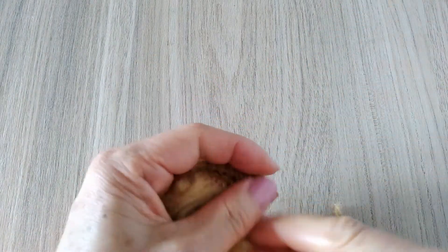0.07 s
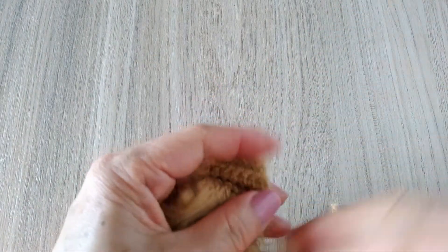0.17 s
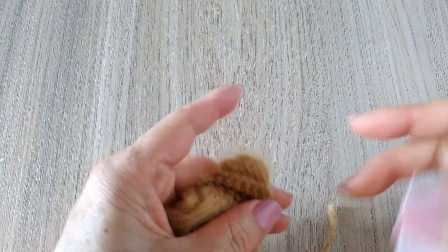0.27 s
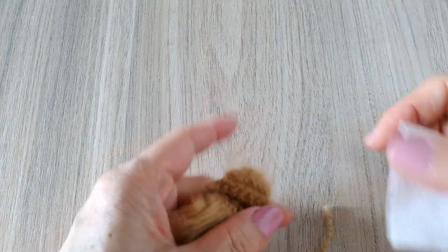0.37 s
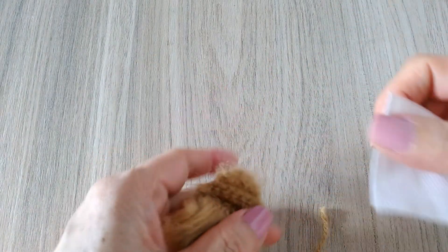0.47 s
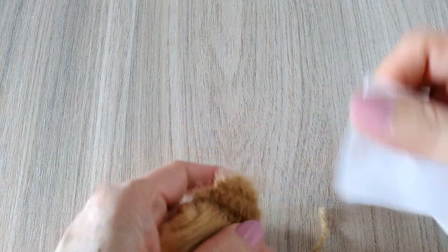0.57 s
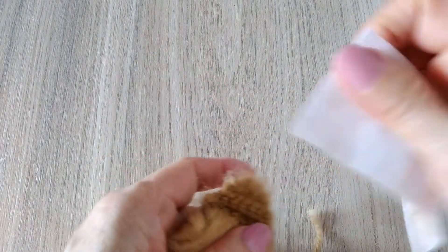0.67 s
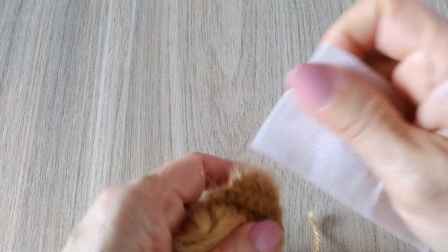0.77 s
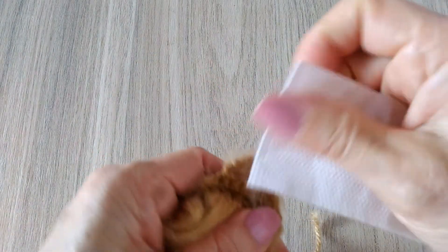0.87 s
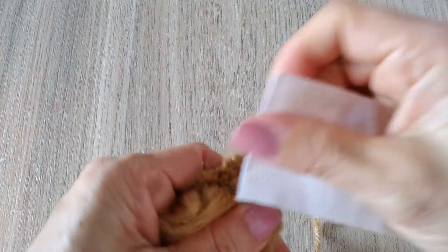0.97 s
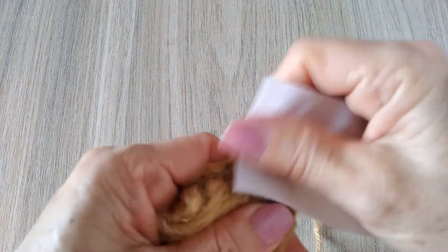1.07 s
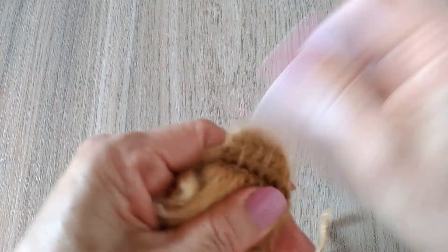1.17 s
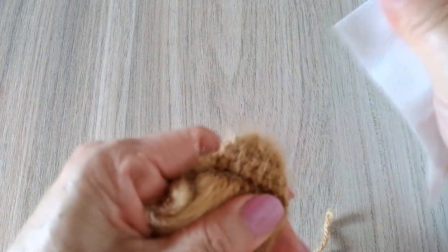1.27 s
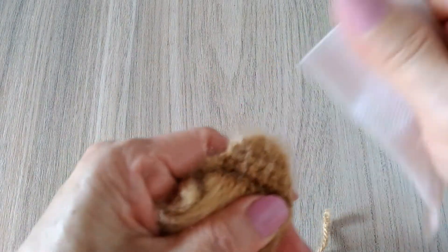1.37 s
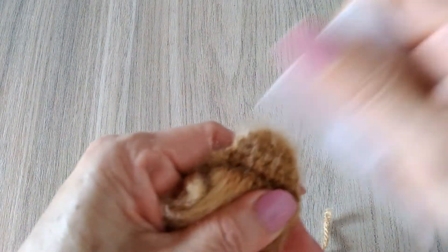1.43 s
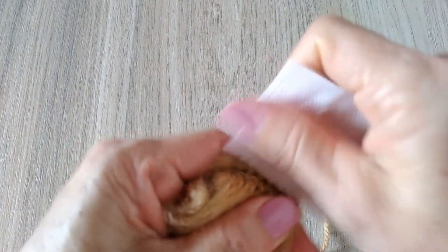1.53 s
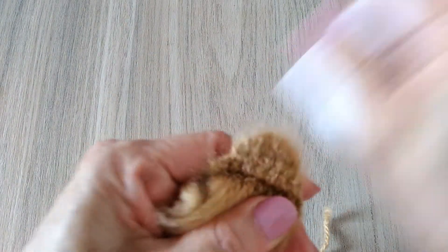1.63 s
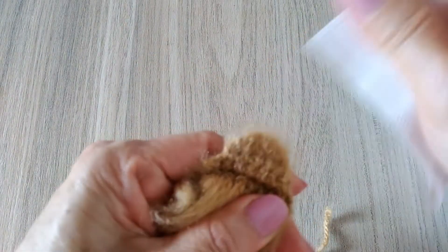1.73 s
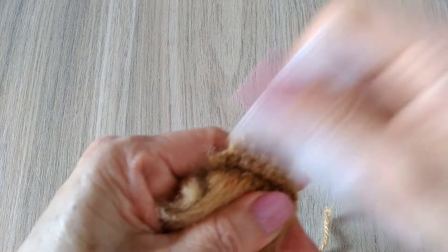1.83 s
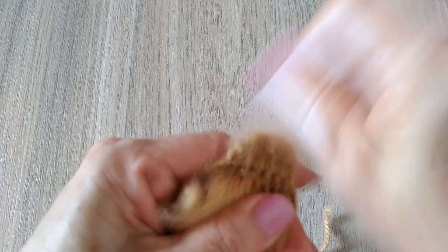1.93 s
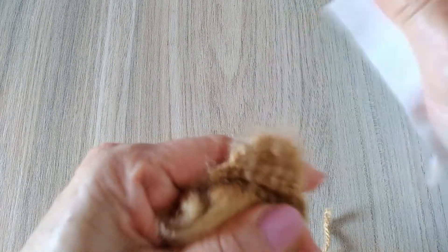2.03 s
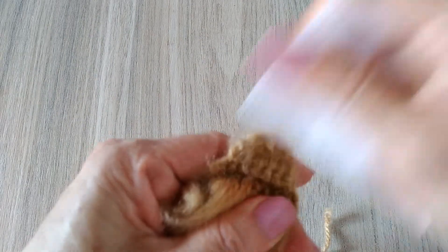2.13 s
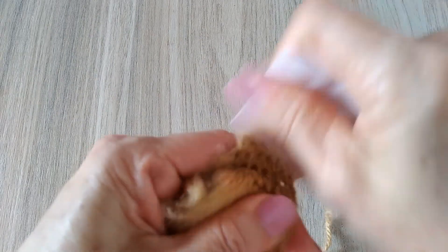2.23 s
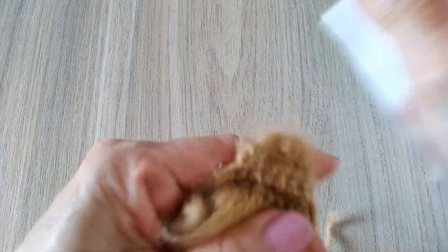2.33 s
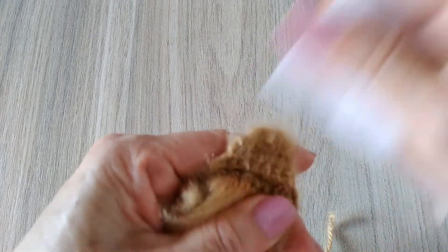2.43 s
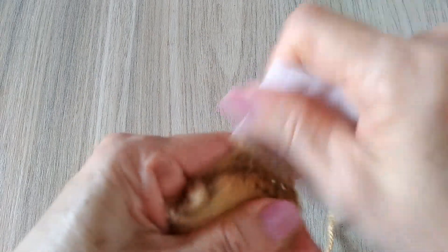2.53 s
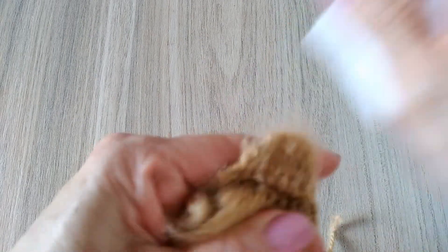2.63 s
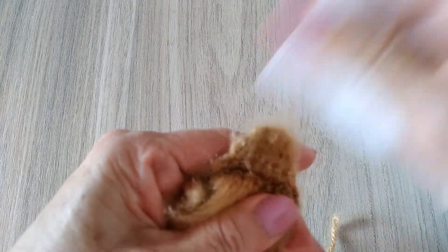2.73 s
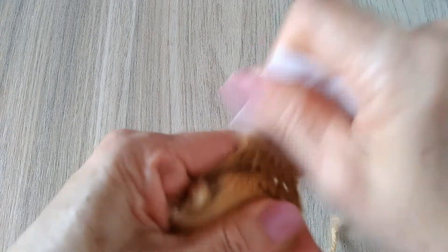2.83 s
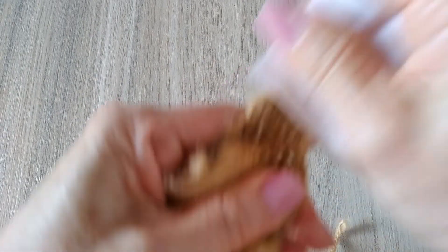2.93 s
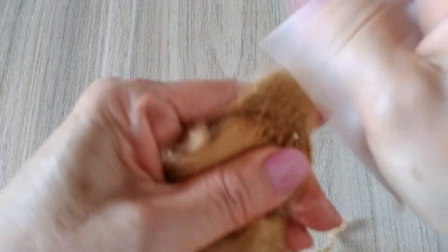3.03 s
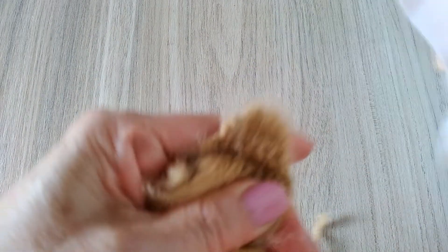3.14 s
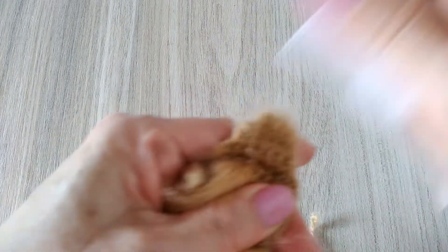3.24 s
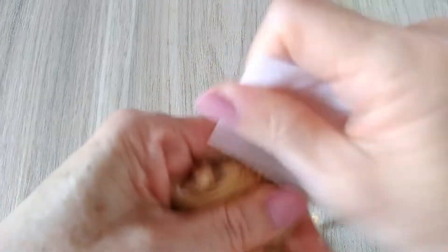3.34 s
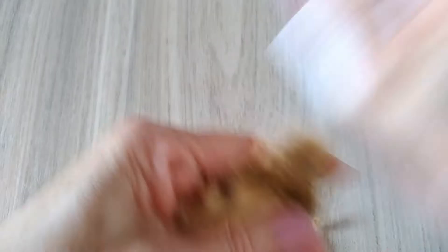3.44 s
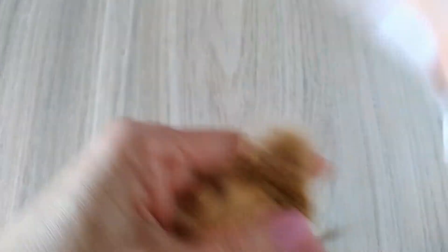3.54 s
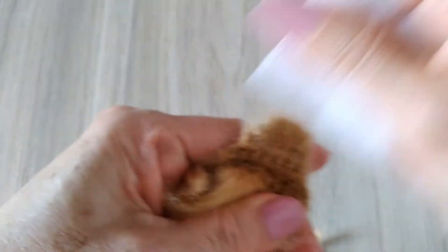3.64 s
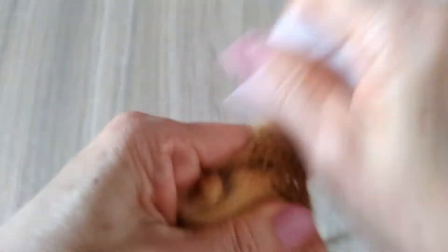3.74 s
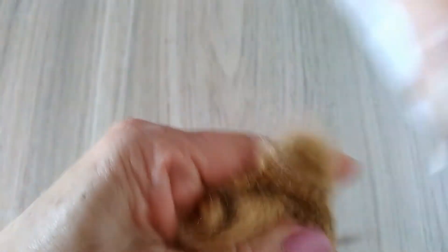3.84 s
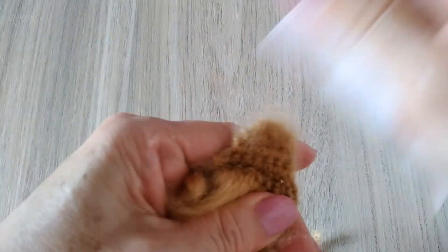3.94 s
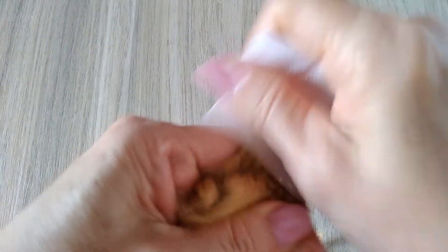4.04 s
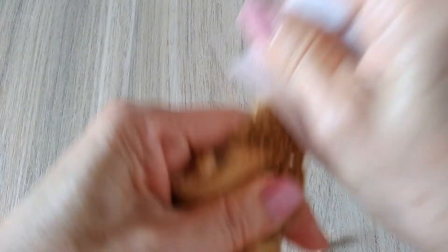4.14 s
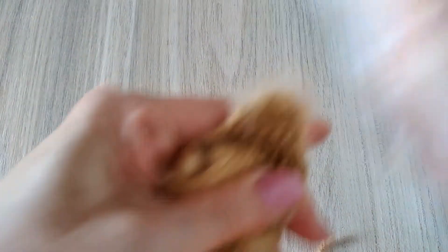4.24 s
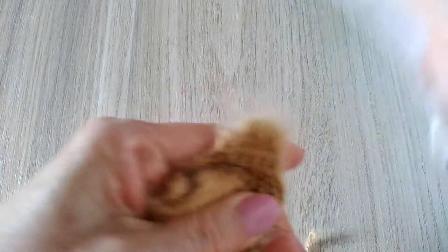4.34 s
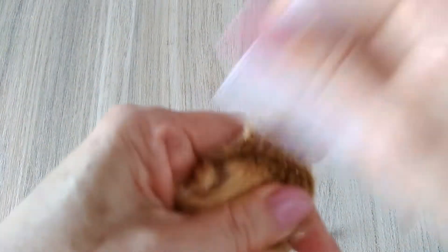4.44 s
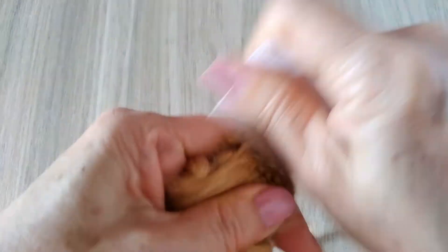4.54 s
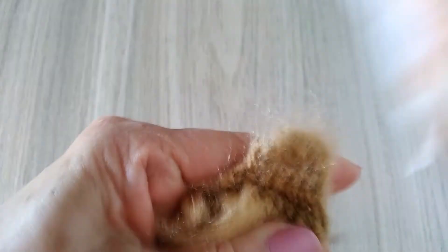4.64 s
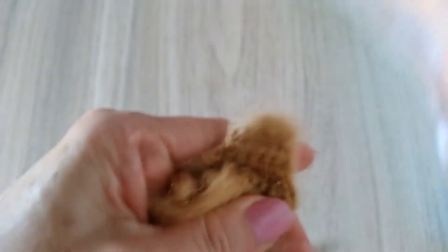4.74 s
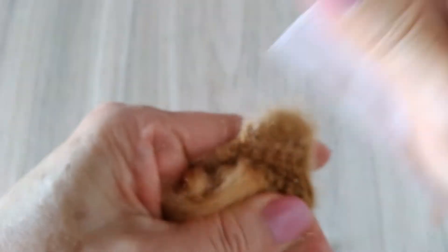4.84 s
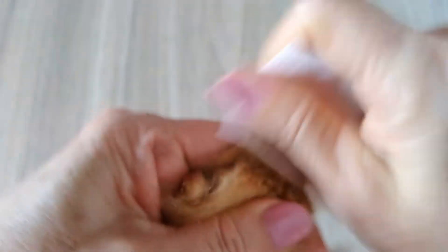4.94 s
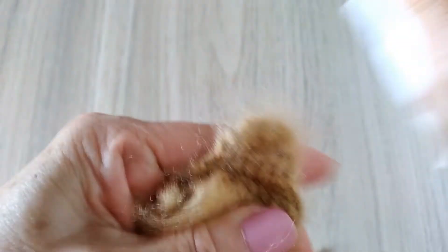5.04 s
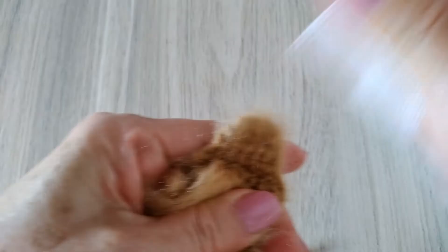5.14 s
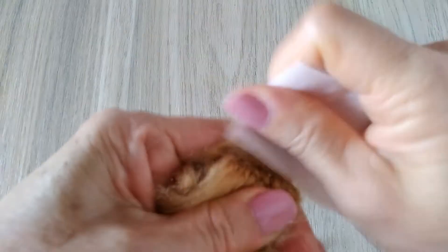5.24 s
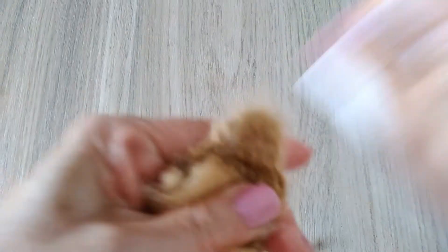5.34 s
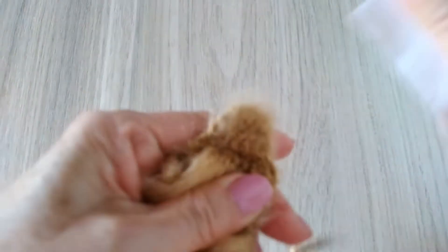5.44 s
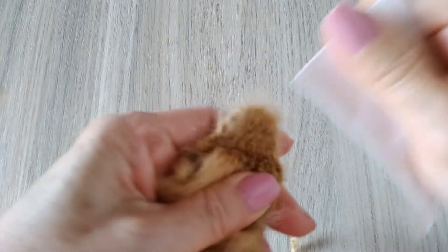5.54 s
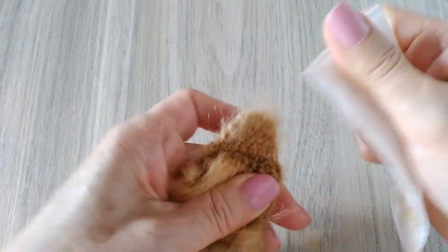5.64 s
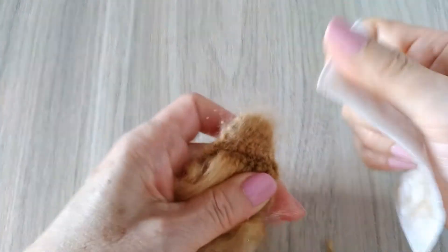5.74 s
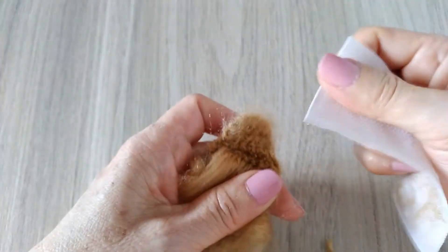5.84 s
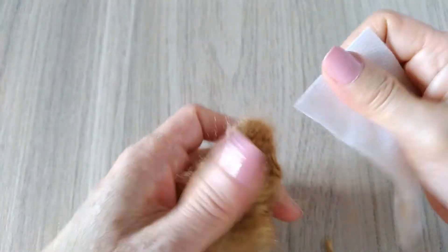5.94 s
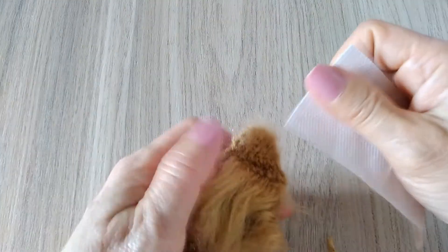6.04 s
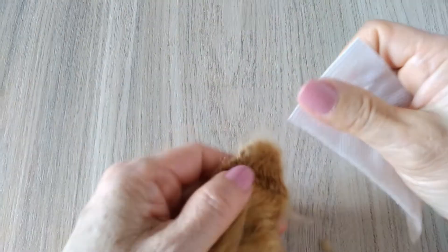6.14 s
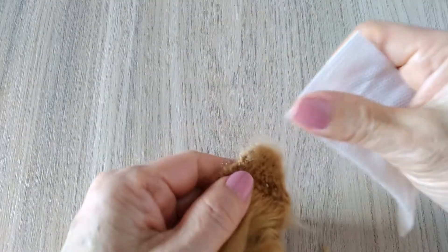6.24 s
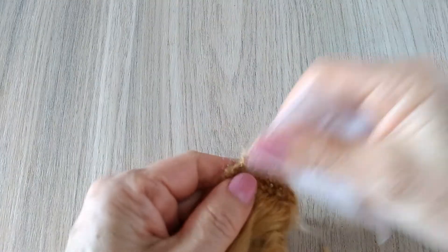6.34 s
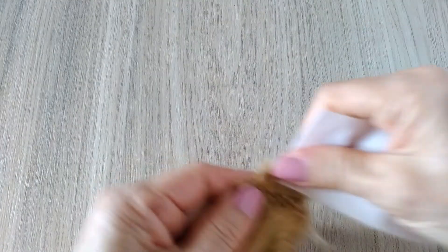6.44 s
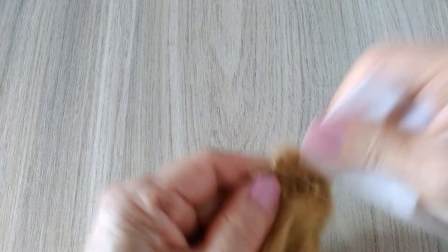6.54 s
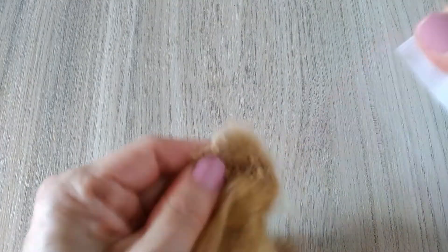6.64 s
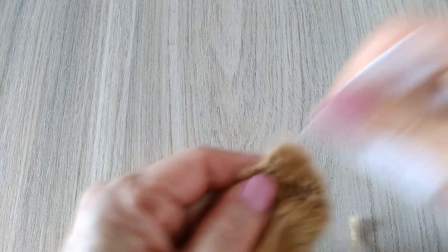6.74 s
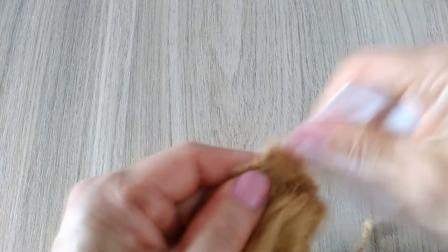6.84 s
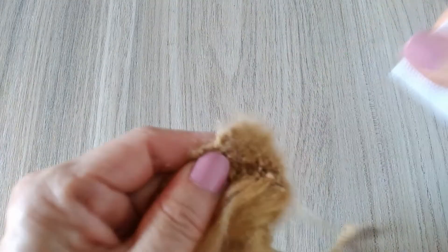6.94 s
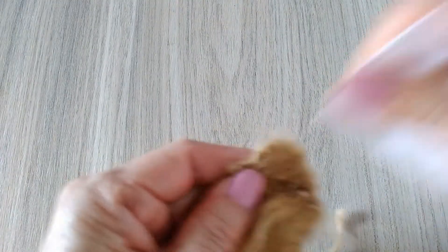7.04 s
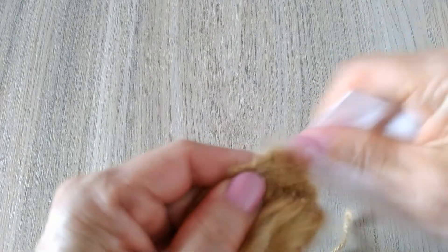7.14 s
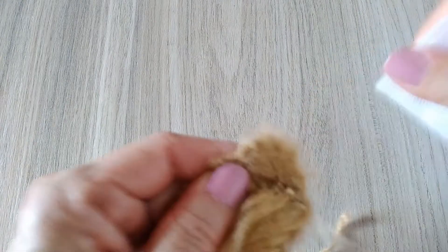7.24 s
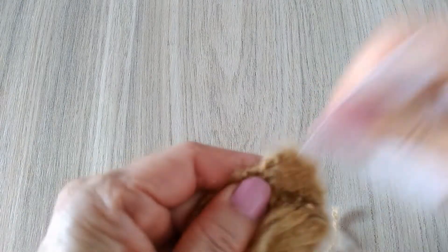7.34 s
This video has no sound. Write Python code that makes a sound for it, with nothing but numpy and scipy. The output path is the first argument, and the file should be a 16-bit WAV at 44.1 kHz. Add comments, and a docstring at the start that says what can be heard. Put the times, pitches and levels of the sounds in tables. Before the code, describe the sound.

Very close to the microphone at a table in a small furnished room, fingers lightly tick and rustle, then a hook-surfaced strip scratches wool yarn in short separate strokes. Each crackling rasp swells quickly and ends in an abrupt snap with a dull little jolt. About three strokes come every second, then a pause with handling sounds and a few softer strokes. Faint rumble and a distant engine hum lie far underneath.

```python
"""A hook strip is brushed over a tuft of wool yarn, close to a phone above a table in a small room.
Each stroke is a swarm of random snaps through strip resonances; it swells, then the strip slips off.
Single hooks snap and the hands jolt (noise bursts); fingers tick and rustle (filtered noise, snaps).
Behind: noise rumble, a dying sine drone and a far engine of sine orders. The phone mutes quiet treble."""
import sys
import numpy as np
from scipy import signal
from scipy.fft import rfft, irfft
from scipy.io import wavfile
from scipy.ndimage import uniform_filter1d

SR = 44100
rng = np.random.default_rng(int(sys.argv[2]) if len(sys.argv) > 2 else 0)


def to_wav(sig):
    """Store sig (one row per channel, or 1-D mono) as 16-bit WAV at the path in sys.argv[1].

    Samples outside -1..1 are clipped; the rate is SR.
    """
    pcm = np.clip(np.atleast_2d(sig), -1, 1) * 32767
    pcm = np.round(pcm).astype(np.int16)
    wavfile.write(sys.argv[1], SR, pcm.T)  # frames by channels


N = 326340
T = np.arange(N) / SR
FREQS = np.arange(N // 2 + 1) * SR / N
ALIGNED_HZ = 6500  # port lag acts below this; room tail is mono above


def undb(db):
    """Decibels to gain."""
    return 10 ** (np.asarray(db) / 20)


def unit(x):
    """Scale to rms 1."""
    return x / np.sqrt(np.mean(x ** 2))


def gains(points, hz):
    """Gain of an (f/Hz, level/dB) spectrum at hz, falling away below its first point."""
    f, db = np.transpose(points)
    curve = undb(np.interp(np.log(hz + 1), np.log(f), db))
    return curve * np.minimum(hz / f[0] + 0.0064, 1)


def response(points, modes=(), size=2048):
    """Minimum-phase impulse response of unit energy: a smooth spectrum with resonances on top."""
    hz = np.arange(size // 2 + 1) * SR / size
    peaks = sum(undb(db) / (1 + (2 * (hz - f) / w) ** 2) for f, w, db in modes)
    cepstrum = irfft(np.log(gains(points, hz) * (1 + peaks)))
    # fold the cepstrum to make the response causal
    cepstrum[1:size // 2] *= 2
    cepstrum[size // 2 + 1:] = 0
    h = irfft(np.exp(rfft(cepstrum)))
    return h / np.linalg.norm(h)


def ring(x, h):
    """Convolve a sound with an impulse response, keeping its length."""
    return signal.oaconvolve(x, h)[:len(x)]


def lows(x, hz, order=4):
    """Zero-phase low-pass."""
    return irfft(rfft(x) / (1 + (FREQS / hz) ** (2 * order)), N)


def walk(rate_hz):
    """Slow random drift of rms 1: random steps, smoothed twice."""
    k = int(SR / rate_hz)
    steps = np.repeat(rng.standard_normal(N // k + 1), k)
    return unit(uniform_filter1d(uniform_filter1d(steps, k), k)[:N])


def snaps(rate_hz, spread_db, even_s):
    """Random snaps of unequal size; the pull of the hand keeps their power even over a short time."""
    n = len(rate_hz)
    chance, size, sign = rng.random(n), rng.exponential(size=n), rng.choice([-1, 1], n)
    train = (chance < rate_hz / SR) * sign * undb(spread_db * np.minimum(size, 5))
    power = np.abs(uniform_filter1d(train ** 2, int(even_s * SR)))
    return train / np.sqrt(power + rate_hz / SR)


def bursts(events, decay_s, crack):
    """A sharp release at each (t/s, level/dB), followed by a short shudder of decaying noise."""
    out, t = np.zeros(2 * N), T[:SR // 8]
    for s, db in events:
        burst = rng.standard_normal(len(t)) * np.exp(-t / decay_s)
        burst /= np.linalg.norm(burst)
        burst[0] += crack
        i = int(s * SR)
        out[i:i + len(t)] += undb(db) * burst
    return out[:N]


# room rumble spectrum: f/Hz, relative level/dB
RUMBLE_SPECTRUM = [(20,6.5),(45,-7),(140,-10.5),(350,-22),(700,-30.5),(1400,-44),(3500,-43.5),(8500,-45),(16000,-64.5)]


def rumble(level_db=-60, side_db=-2.5, drift_db=1.2):
    """Low room rumble: shaped mid and side noise with a slowly drifting level."""
    mid, side = irfft(rfft(rng.standard_normal((2, N))) * gains(RUMBLE_SPECTRUM, FREQS), N)
    stereo = unit(mid) + undb(side_db) * unit(side) * np.array([[1], [-1]])
    return undb(level_db + drift_db * walk(3.8)) * stereo


# drone decay: t/s, rms level/dB before the left/right weights
DRONE_DECAY = [(0,-48),(.09,-50),(.17,-56),(.27,-74),(.4,-110)]


def drone(f_hz=64.5):
    """A low sine that dies away, slightly louder on the left."""
    level_db = np.interp(T, *np.transpose(DRONE_DECAY))
    tone = np.sin(2 * np.pi * f_hz * T) * undb(level_db)
    return np.sqrt(2) * tone * np.array([[1.15], [.85]])


# far engine: t/s, firing rate f/Hz, fundamental level/dB, overtone level/dB re fundamental
ENGINE_PASS = [(1.6, 138.2, -84, -3), (2, 152, -64.5, -12), (2.35, 155.4, -68, 1.5), (2.8, 178, -82, 5.5),
               (3.15, 191.2, -62, -13.5), (3.6, 206.4, -63.5, -14), (4.1, 217.2, -82, -7.5),
               (4.55, 214.7, -58.5, -24), (5.7, 194.9, -62.5, -23.5), (6.1, 185.5, -78, -20.5)]
# overtones: multiple of firing rate, relative level/dB
OVERTONES = [(2,-2.5),(3,-15)]


def engine():
    """Far engine: firing rate rises, then falls; sine orders with wavering pitch and levels."""
    points_s, *columns = np.transpose(ENGINE_PASS)
    hz, level_db, bright_db = (np.interp(T, points_s, c) for c in columns)
    phase = 2 * np.pi * np.cumsum(hz * (1 + .004 * walk(14))) / SR
    overtones = sum(undb(db + 2 * walk(7.7)) * np.sin(round(k) * phase) for k, db in OVERTONES)
    tone = np.sin(phase) + undb(bright_db) * overtones
    return np.sqrt(2) * undb(level_db + walk(3.3)) * tone


# light ticks of fingers and nails on the strip, and a hook snapping at 1.03 s: t/s, relative level/dB
LIGHT_TICKS = [(0.188, -46), (0.2339, -42), (0.4444, -55), (0.516, -49), (0.75, -46), (0.7946, -41.5),
               (0.8148, -39), (0.9807, -50), (1.0277, -36), (1.2614, -35), (1.7148, -52), (1.7524, -51.5),
               (1.812, -51), (2.0961, -51.5), (2.4056, -52), (3.601, -53.5), (4.6991, -51.5),
               (5.6542, -48.5), (5.909, -36), (6.0392, -40.5), (6.0569, -39.5), (7.0347, -55), (7.318, -50)]
# fingers shifting on the yarn: t/s, length/s, rustle level/dB, dull bump level/dB (both before filters)
FINGER_SHIFTS = [(0.184, 0.056, -65, -69), (0.257, 0.049, -63, -95), (0.348, 0.0095, -90, -55),
                 (0.478, 0.27, -69.5, -91), (0.785, 0.15, -63, -80), (1.437, 0.031, -59, -72),
                 (2.783, 0.019, -78, -49), (2.947, 0.027, -54, -73), (4.005, 0.011, -67, -50.5),
                 (4.475, .014, -54, -50), (4.905, 0.022, -68, -51), (5.218, 0.019, -78.5, -51.5),
                 (5.699, 0.049, -66.5, -50), (5.768, 0.04, -88.5, -56.5), (5.946, 0.092, -58, -69.5),
                 (6.075, 0.059, -63, -82), (6.169, 0.041, -66, -82), (7.084, 0.038, -75.5, -57.5)]
# finger spectrum: f/Hz, relative level/dB
FINGER_SPECTRUM = [(590, -16.5), (1000, -12), (1770, -17), (2200, -4.5), (2980, 0.5), (4520, -5.5),
                   (5830, -8.5), (8650, -5.5), (10300, -15.5), (16000, -24.5)]
# dull bump spectrum: f/Hz, relative level/dB
BUMP_SPECTRUM = [(60, -22), (135, 10), (200, -1.5), (400, -12), (1500, -46.5)]


def handling(stray_rate_hz=30, stray_db=-70, stray_spread_db=27, ragged_db=4, tick_db=12):
    """Fingers tick, rustle and bump, one hook snaps; stray fibres crackle, a few of them louder."""
    s, length_s, rustle_db, bump_db = np.transpose(FINGER_SHIFTS)
    moves = np.exp(-(2 * (T - s[:, None]) / length_s[:, None]) ** 2)
    fibres = snaps(np.full(N, 1500.), spread_db=5.5, even_s=0.02) * undb(ragged_db * walk(150))
    rustle = undb(rustle_db) @ moves * fibres
    stray_level = undb(stray_db + stray_spread_db * rng.random(N) ** 2)
    strays = (rng.random(N) < stray_rate_hz / SR) * stray_level
    ticks = undb(tick_db) * bursts(LIGHT_TICKS, decay_s=0.0007, crack=0.2)
    bumps = undb(bump_db) @ moves * ring(rng.standard_normal(N), response(BUMP_SPECTRUM))
    return ring(rustle + strays + ticks, response(FINGER_SPECTRUM)) + bumps


# strip resonances in the cupped hand: f/Hz, width/Hz, level/dB re smooth spectrum
STRIP_MODES = [(530,63,-5),(946,250,-0.5),(1750,58,-24.5),(2321,560,-6),(2882,340,-3.5),(3630,400,-1),(4470,57,-8.5),(6170,450,-4.5),(7770,100,-12),(8765,600,-8)]


def bent_strip(detune=0.016):
    """The strip is bent a little differently on each stroke, which moves its resonances."""
    bends = rng.standard_normal(len(STRIP_MODES))
    return [(f * np.exp(detune * bend), w, db) for (f, w, db), bend in zip(STRIP_MODES, bends)]


SWELL_DB, SWELL_BEND = 40, 1.045  # rise over one swell time; bend > 1: fastest at the start
TAUT_S, SLACK_DB = 0.012, -15.5  # yarn pulls taut just before letting go; slack yarn tugs this much less
GRAZE_DB = 16  # extra backing share at light first touch


def pull(t, end_s, swell_s, hold_s, release_s):
    """Force on the hooks and share that tugs the backing: swell, hold, slip off the tuft."""
    to_go = np.maximum(end_s - hold_s - t, 0) / swell_s
    release = np.exp(-np.maximum(t - end_s, 0) / release_s)
    force = undb(-SWELL_DB * to_go ** SWELL_BEND) * release
    slack = 1 - np.exp(-(np.maximum(end_s - t, 0) / TAUT_S) ** 2)
    return force, undb(SLACK_DB * slack + GRAZE_DB * np.minimum(to_go, 1))


CATCH_DB, CATCH_RATE_HZ = 1.9, 400  # clumping of a firm stroke
FIRM_DB = -24.5  # table level of a firm stroke
# per dB that a stroke is lighter: dB more clumping; dB per octave less top treble (over one octave)
LIGHT_CATCH, LIGHT_DULL = .1, .2
# strokes: let-go t/s, swell/s, hold/s, release/s, relative hook level/dB,
# relative backing tug/dB, relative jolt of the hands/dB
STRIP_STROKES = [ (1.062, 0.044, .022, 0.01, -50, 12.5, -41), (1.159, 0.14, 0.035, 0.004, -37, -3.5, -25),
                 (1.292, .014, 0.011, 0.018, -38, -29, -38), (1.592, 0.11, 0.013, 0.0045, -26.5, -3, -25),
                 (1.926, 0.068, 0.0069, 0.0022, -26, -4.5, -19),
                 (2.256, .07, .016, 0.0034, -25.5, -7.5, -28.5),
                 (2.532, 0.049, .013, 0.037, -37, -20.5, -50),
                 (2.573, 0.08, 0.013, 0.0036, -29.5, -1.5, -20), (2.836, 0.05, .012, 0.013, -34, -32, -50),
                 (3.041, .022, 0.01084, 0.0018, -37, -2.5, -30.5),
                 (3.410, 0.068, .022, 0.0018, -25.5, -8, -22.5),
                 (3.758, 0.057, 0.0085, 0.0048, -23.5, -12.5, -26),
                 (4.075, 0.047, 0.023, 0.0079, -37.5, -26, -46),
                 (4.201, .074, 0.013, 0.0059, -26, -8.5, -32.5),
                 (4.509, 0.021, 0.0033, 0.0032, -28.5, -9, -31.5),
                 (4.585, 0.19, .011, 0.0051, -24.5, -8.5, -25),
                 (4.972, 0.053, 0.014, 0.0017, -26, -10, -19),
                 (5.302, 0.09, 0.0073, 0.0068, -31, -2, -24.5),
                 (6.432, 0.057, 0.049, .012, -52.5, -10, -45),
                 (6.552, 0.033, 0.019, 0.0049, -44, 3.5, -35.5),
                 (6.839, 0.043, 0.0088, 0.0088, -36, -2, -28.5), (7.144, 0.022, .018, 0.011, -41, -6, -37),
                 (7.405, .025, 0.0038, 0.0048, -42.5, -3, -40), ]
# hook spectrum: f/Hz, relative level/dB
HOOK_SPECTRUM = [(350, -39), (600, -23.5), (1290, -14.5), (1960, -11.5), (2220, -5.5), (2570, -13),
                 (3030, -5), (3290, -10.5), (5980, -6.5), (7430, -4), (8750, -2.5), (11500, -16.5),
                 (15500, -25.5)]
# backing spectrum: f/Hz, relative level/dB
BACKING_SPECTRUM = [(100,-16),(200,-8),(350,0.5),(600,0),(1000,-2),(1600,-6),(2200,-5),(3200,-6.5),(5000,-5.5),(9000,-30)]


def brushing(hook_rate_hz=6000, tug_rate_hz=1800, hook_db=1, tug_db=1.5, treble_hz=4000):
    """Hooks snap out of the fibres, heavier tugs shake the backing; light strokes clump and dull."""
    out, free_s = np.zeros(N), 0
    catching, stall = walk(CATCH_RATE_HZ), stalls()
    for end_s, swell_s, hold_s, release_s, db, backing_db, _ in STRIP_STROKES:
        near = (T > max(free_s, end_s - hold_s - 2 * swell_s)) & (T < end_s + .1)
        free_s = end_s  # the strip cannot bite again before it has let go
        light_db = max(FIRM_DB - db, 0)
        clump_db = (CATCH_DB + LIGHT_CATCH * light_db) * np.minimum(catching[near], 1.6)
        clumps = unit(undb(clump_db))
        force, tug = pull(T[near], end_s, swell_s, hold_s, release_s)
        force = force * undb(db) * stall[near]
        engaged = .3 + np.sqrt(force / undb(-25.5))  # more hooks bite under pressure
        hooks = snaps(hook_rate_hz * engaged, spread_db=4.5, even_s=0.007)
        tugs = snaps(tug_rate_hz * engaged, spread_db=1, even_s=0.006) * tug * undb(backing_db)
        dull_db = LIGHT_DULL * light_db
        colour = [(f, d - dull_db * np.clip(np.log2(f / treble_hz), 0, 1)) for f, d in HOOK_SPECTRUM]
        modes = bent_strip()
        out[near] += undb(hook_db) * ring(clumps * force * hooks, response(colour, modes))
        out[near] += undb(tug_db) * ring(clumps * force * tugs, response(BACKING_SPECTRUM, modes))
    return out


# single hooks that hold on and snap: t/s, relative level/dB
HOOK_SNAGS = [(1.0574, -46), (1.1044, -25.5), (1.1308, -18), (1.1507, -23), (1.1614, -21.5),
              (1.2815, -28.5), (1.3184, -39), (1.4087, -35.5), (1.5778, -16.5), (1.9061, -18.5),
              (2.2328, -27), (2.5147, -33.5), (2.5566, -18.5), (2.809, -32.5), (3.7484, -18.5),
              (4.1415, -31), (4.1614, -31), (4.494, -26.5), (4.5037, -17), (4.9551, -18.5), (5.233, -34),
              (5.2384, -29.5), (6.418, -36), (6.4358, -33), (6.8314, -25), (7.1262, -29)]


def snags(snap_db=12, knock_db=5):
    """A hook that has held on snaps free and knocks the backing."""
    releases = bursts(HOOK_SNAGS, decay_s=0.0036, crack=0.25)
    snap = ring(releases, response(HOOK_SPECTRUM, STRIP_MODES))
    knock = ring(releases, response(BACKING_SPECTRUM, STRIP_MODES))
    return undb(snap_db) * snap + undb(knock_db) * knock


def stalls(stall_s=0.0068, stall_db=-7.5):
    """While a hook holds on, the strip stalls: the other hooks fall quiet until the snag gives way."""
    before_s = np.array(HOOK_SNAGS)[:, :1] - T
    holding = np.exp(-np.abs(before_s) / stall_s) * (before_s > 0)
    return undb(stall_db * np.max(holding, axis=0))


# jolt spectrum: f/Hz, relative level/dB
JOLT_SPECTRUM = [(30,-17),(70,-6),(140,0.5),(200,-2.5),(320,-15),(700,-38),(2000,-70)]


def jolts(lead_s=.002):
    """The hands jolt as the strip lets go: low-filtered bursts."""
    releases = [(stroke[0] - lead_s, stroke[-1]) for stroke in STRIP_STROKES]
    return ring(bursts(releases, decay_s=0.0043, crack=1.7), response(JOLT_SPECTRUM))


PORT_LAG_SAMPLES = 10
SCATTER = 1.15  # scale of the treble phase turn
# left minus right at the ports: f/Hz, level/dB
PORT_TILT = [(150,-6),(500,-6.5),(1100,-4),(1800,-2),(2800,-6),(3600,-1),(5000,-.5),(7500,-2),(10000,-1.5),(13000,-2.5)]


def ports(x, scatter_s=0.00089, scatter_hz=4000, count=3):
    """The right port hears the hands louder, and first below ALIGNED_HZ; the table scatters treble."""
    tilt = np.sqrt(gains(PORT_TILT, np.maximum(FREQS, PORT_TILT[0][0])))
    low = 1 / (1 + (FREQS / ALIGNED_HZ) ** 24)
    lag = low * np.exp(-2j * np.pi * FREQS * PORT_LAG_SAMPLES / SR) + 1 - low
    # the contact hops between a few places along the strip
    places = np.array([undb(30 * walk(220)) for _ in range(count)])
    t, spectrum = T[:SR // 100], 0
    for share in places / places.sum(axis=0):
        # each place has its own short paths to each port, which turn the phase of the treble
        paths = rng.standard_normal((2, len(t))) * np.exp(-t / scatter_s)
        paths /= np.linalg.norm(paths, axis=1, keepdims=True)
        turn = rfft(paths, N).imag * np.sqrt(2)
        phase = SCATTER * turn * FREQS / (FREQS + scatter_hz)
        spectrum = spectrum + rfft(x * share) * np.exp(1j * phase)
    return irfft(spectrum * np.array([lag * tilt, 1 / tilt]), N)


def room(x, t60_s=0.21, wet_db=-14.5, first_s=0.00057, last_s=0.11, dull_hz=11500):
    """Small furnished room as the phone passes it on: a short, slightly dull noise tail,
    cut off abruptly, its top in the middle."""
    t = T[:SR // 4]
    noise = rng.standard_normal((2, N))
    wide = lows(noise, ALIGNED_HZ, order=8)
    noise = lows(wide + (noise - wide)[0], dull_hz, order=1)
    tails = noise[:, :len(t)] * undb(-60 * t / t60_s) * (t > first_s) * (t < last_s)
    return undb(wet_db) * np.array([ring(x, h / np.linalg.norm(h)) for h in tails])


def scene(room_left_db=2.0):
    """The hands at the ports, their room, a little louder on the left, and the background."""
    background = rumble() + drone() + engine()
    hands = handling() + brushing() + snags() + jolts()
    room_balance = undb(np.array([[room_left_db], [-room_left_db]]) / 2)
    return ports(hands) + room(hands) * room_balance + background


def record(dry, gate_db=-66, depth_db=-9, gate_hz=1200, top_hz=15900):
    """The phone turns the treble down whenever it falls quiet, and cuts the top."""
    bass = lows(dry, gate_hz, order=2)
    treble = dry - bass
    power = uniform_filter1d(np.mean(treble ** 2, axis=0), SR // 100)
    excess = (power / undb(gate_db) ** 2) ** 4
    gate = (excess + undb(depth_db)) / (excess + 1)
    top_cut = signal.ellip(10, .2, 70, top_hz, fs=SR, output="sos")
    return signal.sosfilt(top_cut, bass + gate * treble)


dry = scene()
out = record(dry)
to_wav(out)
```